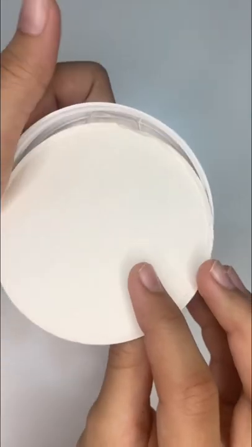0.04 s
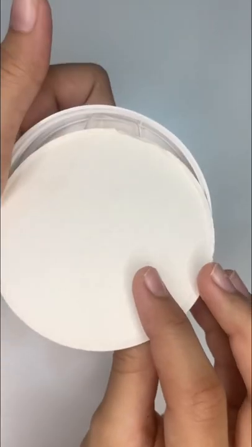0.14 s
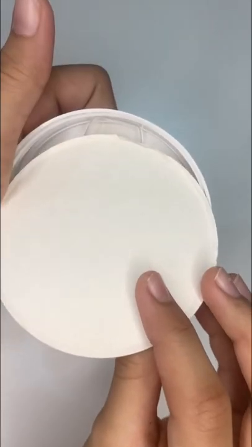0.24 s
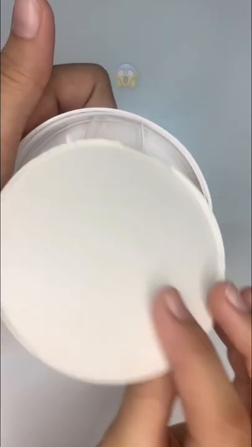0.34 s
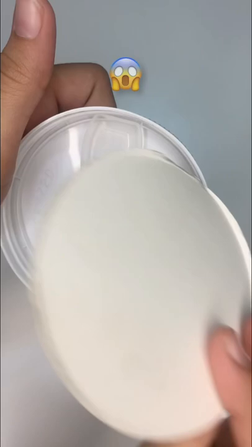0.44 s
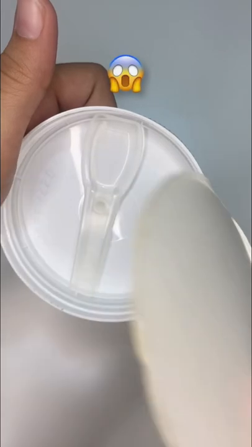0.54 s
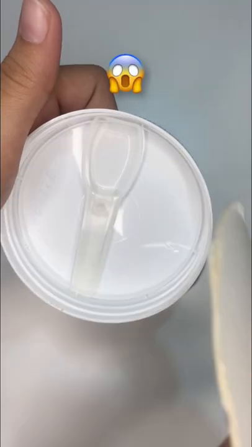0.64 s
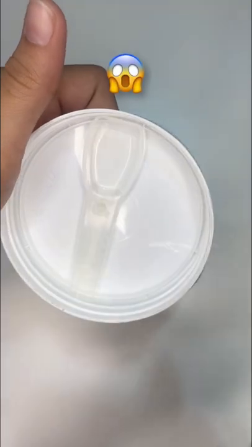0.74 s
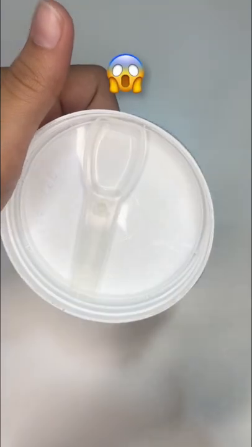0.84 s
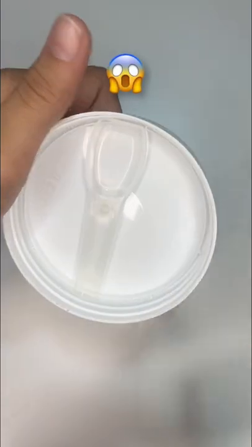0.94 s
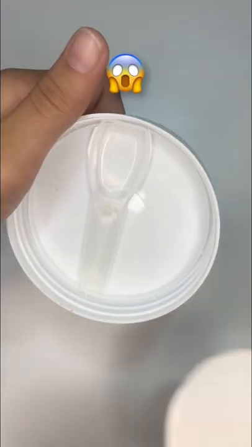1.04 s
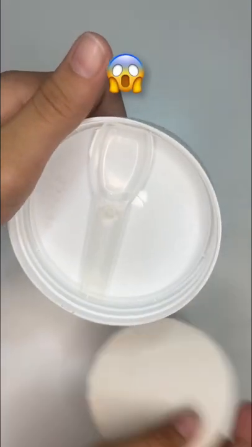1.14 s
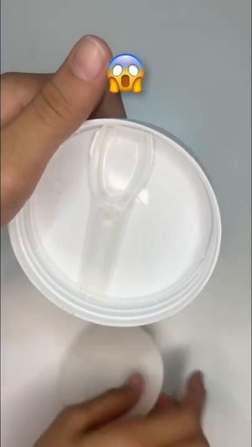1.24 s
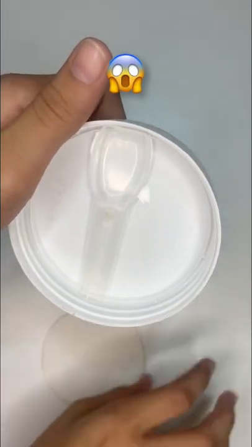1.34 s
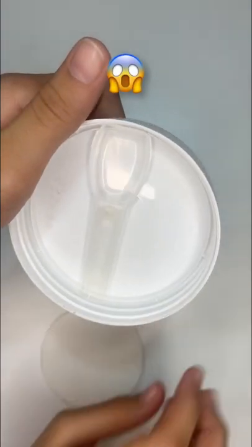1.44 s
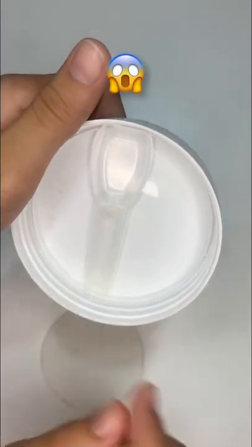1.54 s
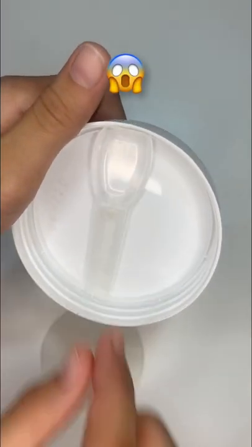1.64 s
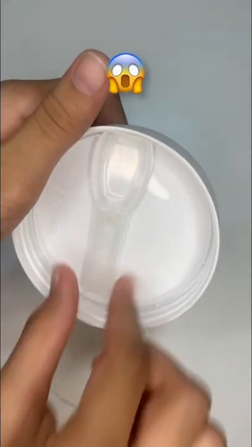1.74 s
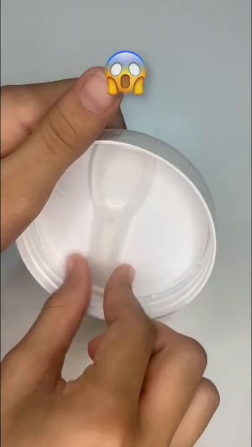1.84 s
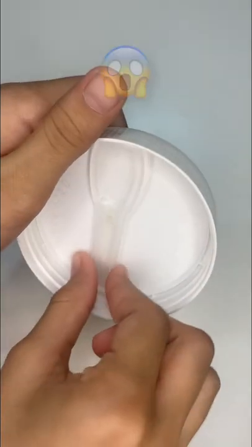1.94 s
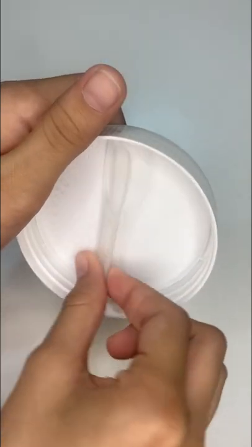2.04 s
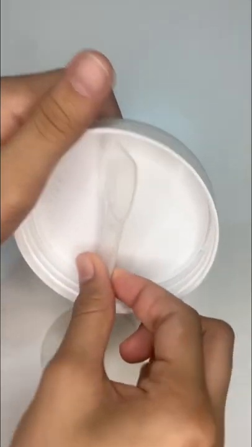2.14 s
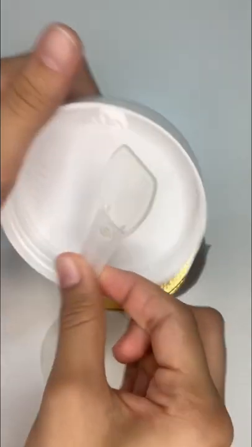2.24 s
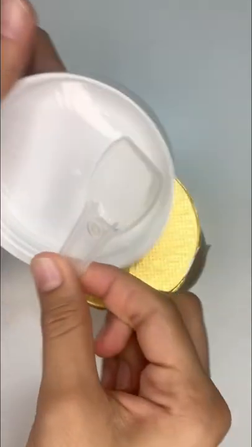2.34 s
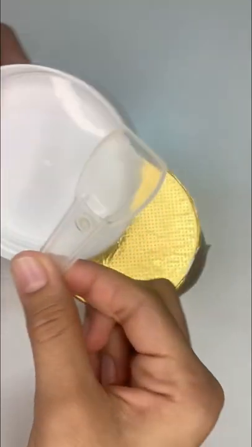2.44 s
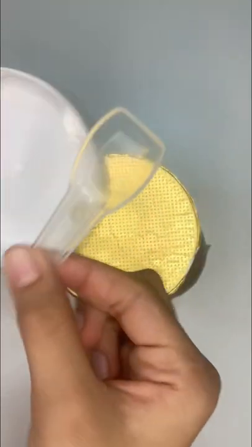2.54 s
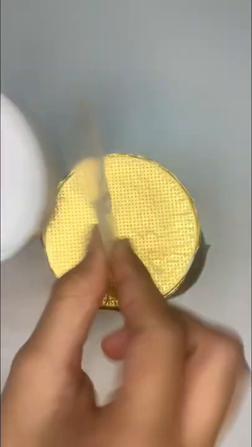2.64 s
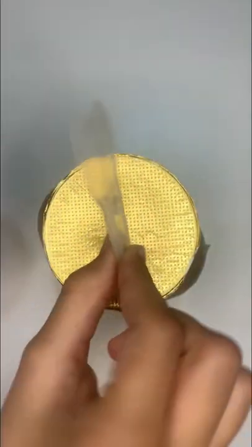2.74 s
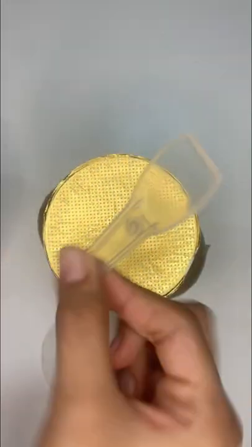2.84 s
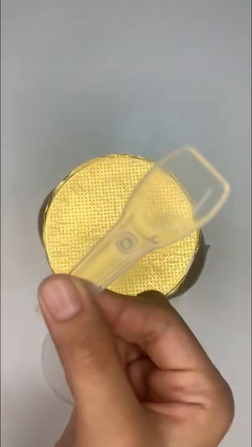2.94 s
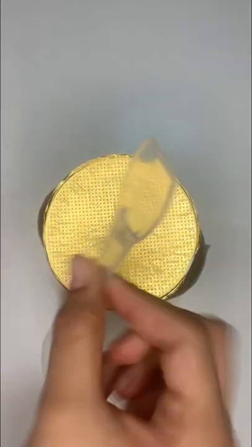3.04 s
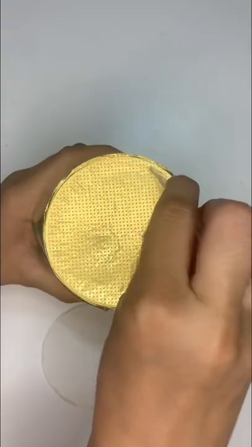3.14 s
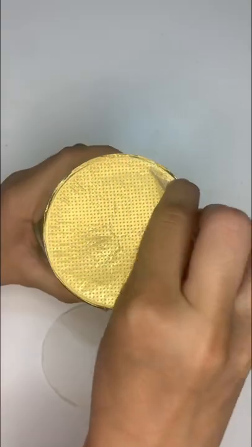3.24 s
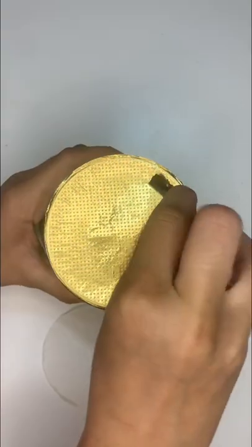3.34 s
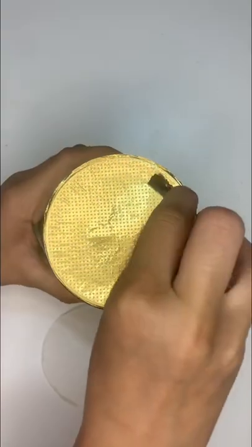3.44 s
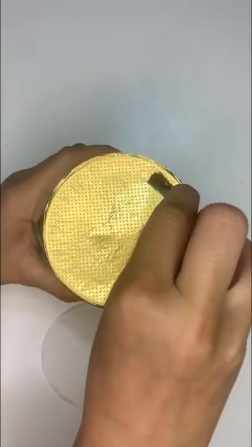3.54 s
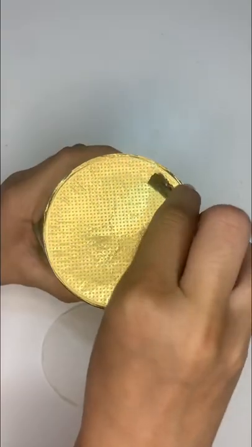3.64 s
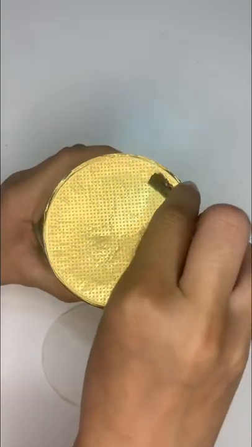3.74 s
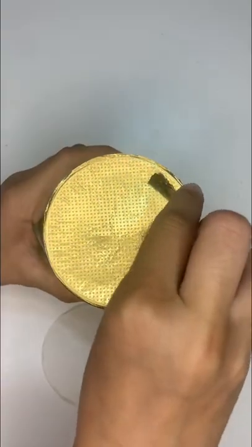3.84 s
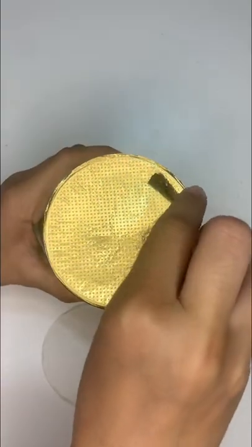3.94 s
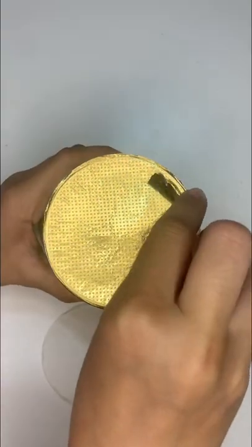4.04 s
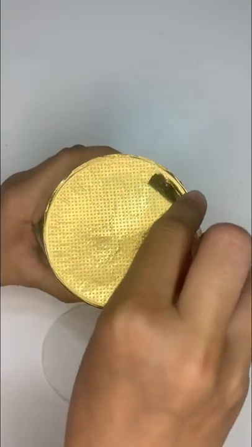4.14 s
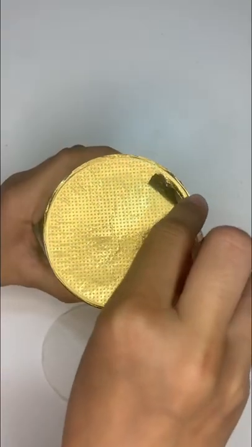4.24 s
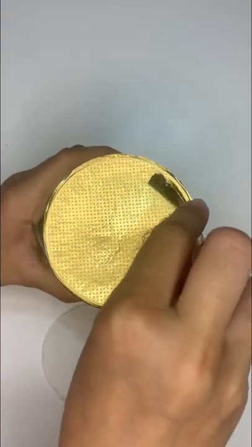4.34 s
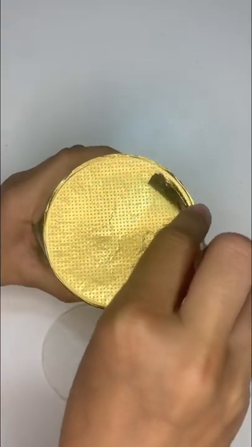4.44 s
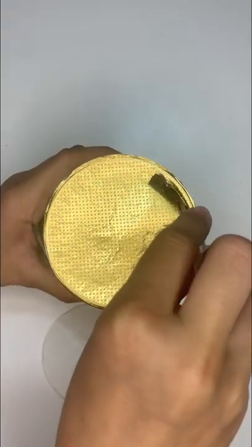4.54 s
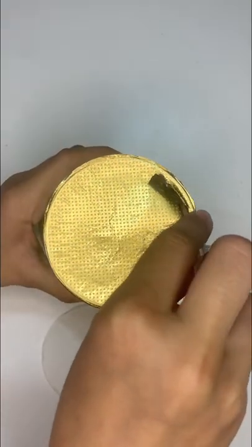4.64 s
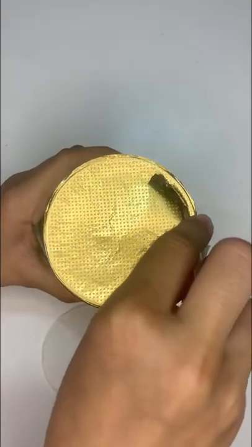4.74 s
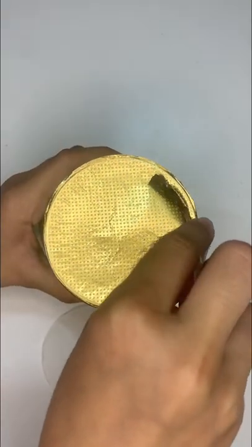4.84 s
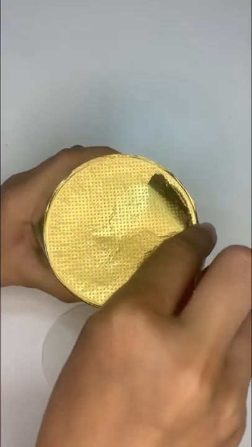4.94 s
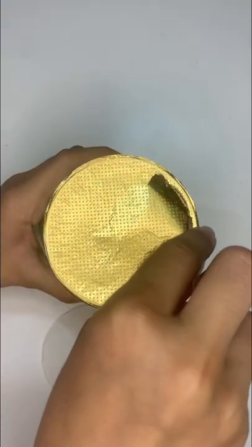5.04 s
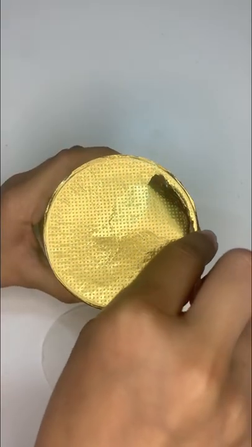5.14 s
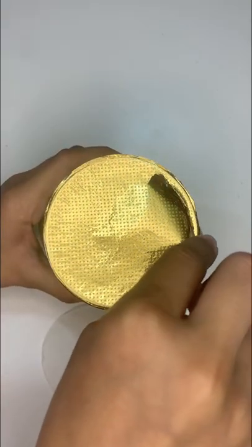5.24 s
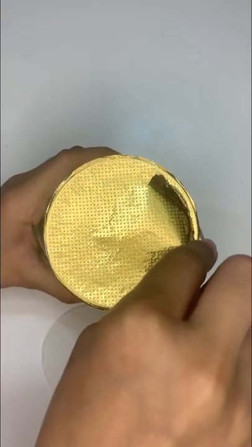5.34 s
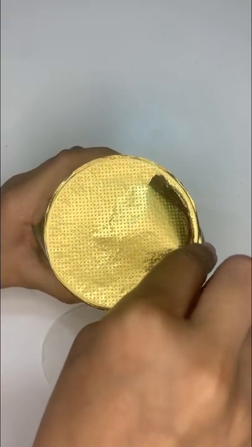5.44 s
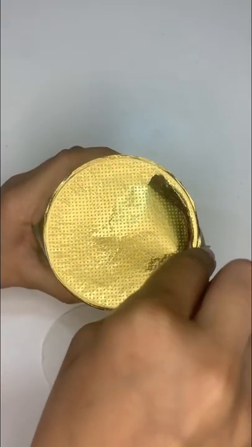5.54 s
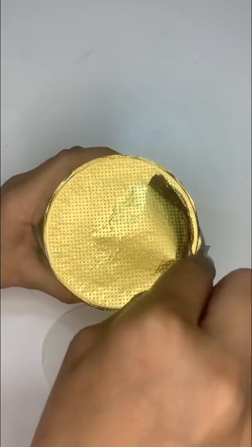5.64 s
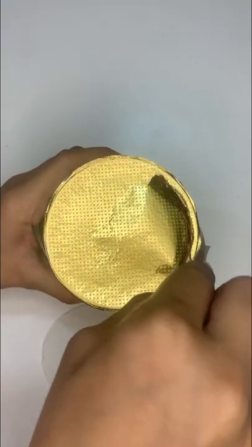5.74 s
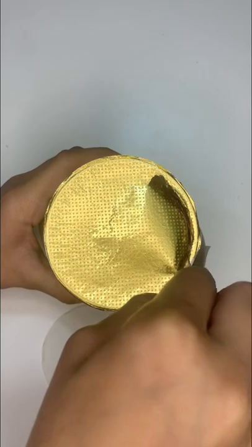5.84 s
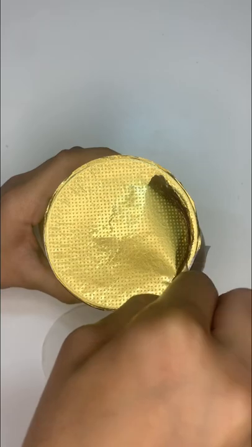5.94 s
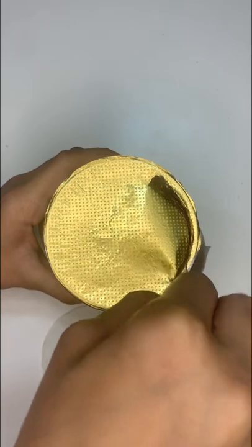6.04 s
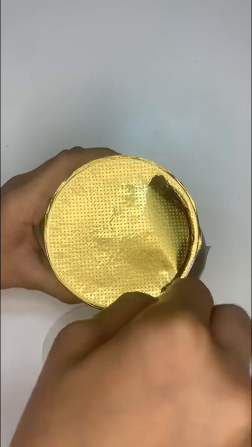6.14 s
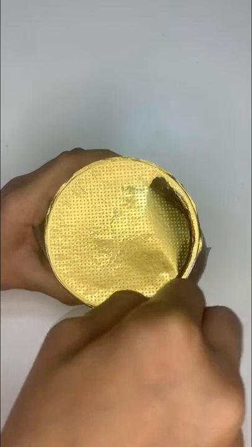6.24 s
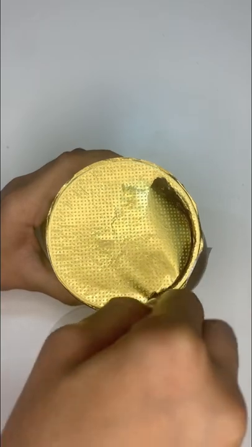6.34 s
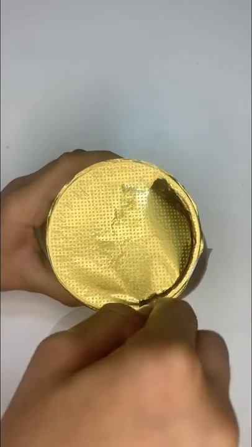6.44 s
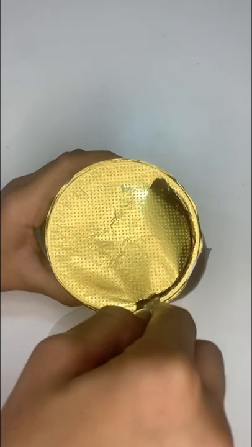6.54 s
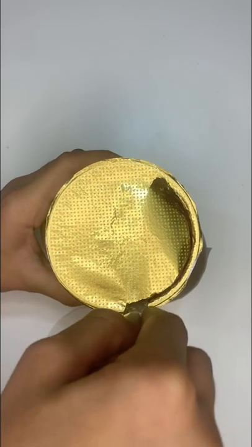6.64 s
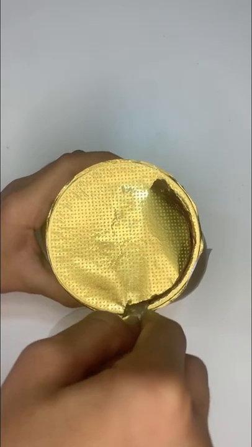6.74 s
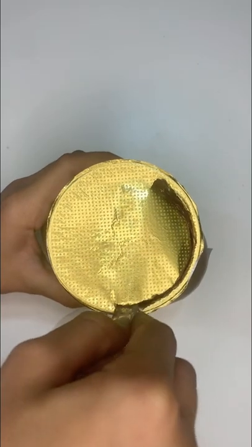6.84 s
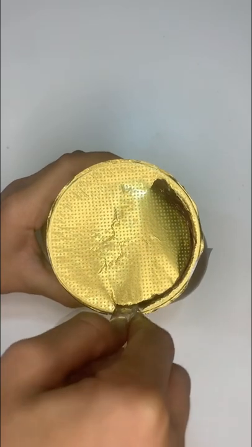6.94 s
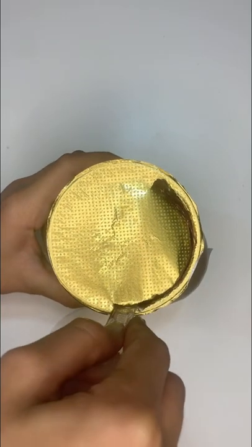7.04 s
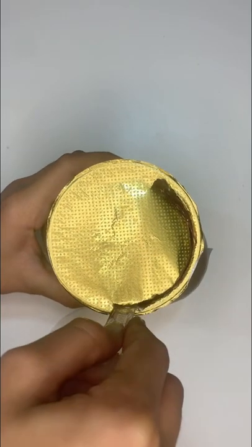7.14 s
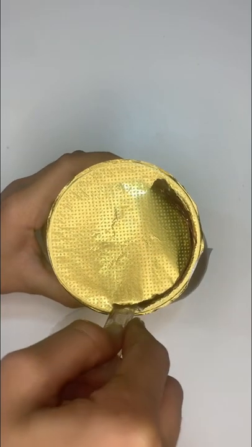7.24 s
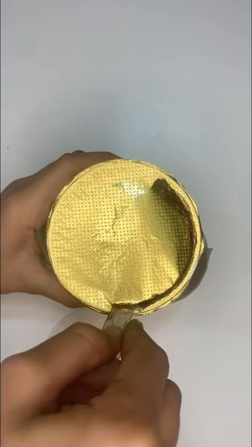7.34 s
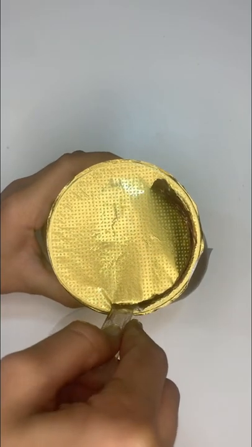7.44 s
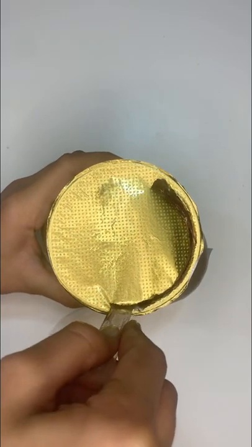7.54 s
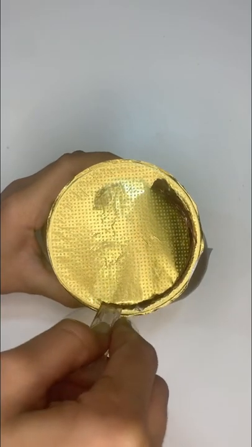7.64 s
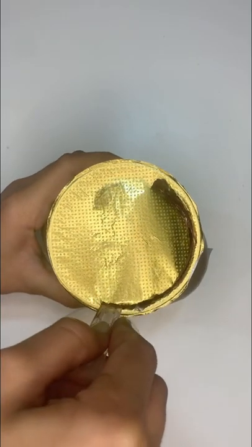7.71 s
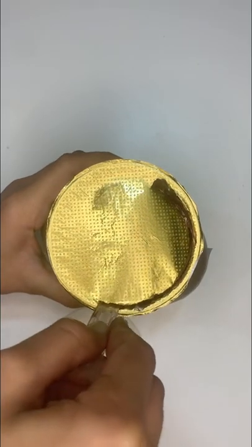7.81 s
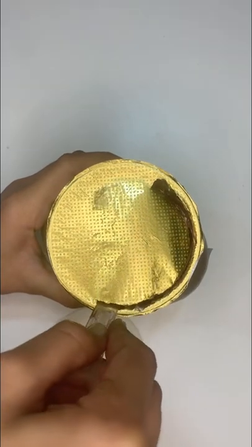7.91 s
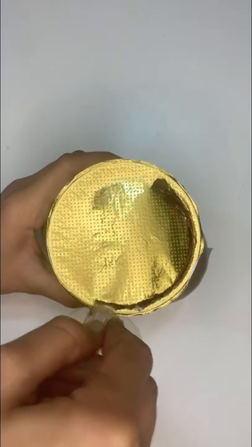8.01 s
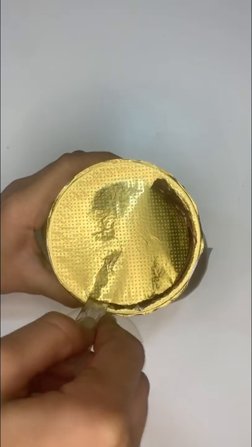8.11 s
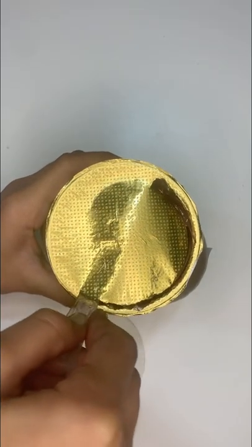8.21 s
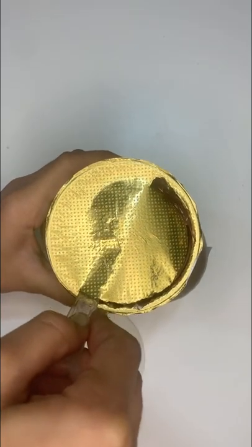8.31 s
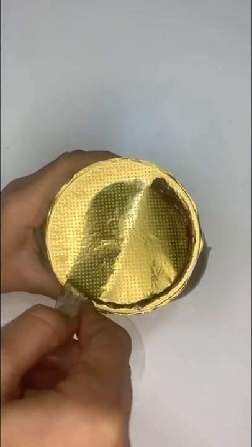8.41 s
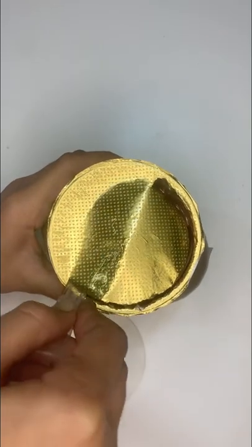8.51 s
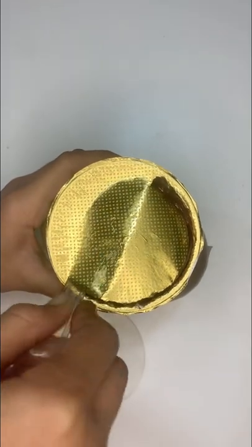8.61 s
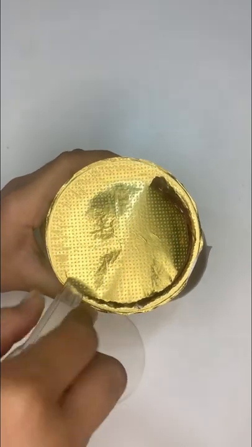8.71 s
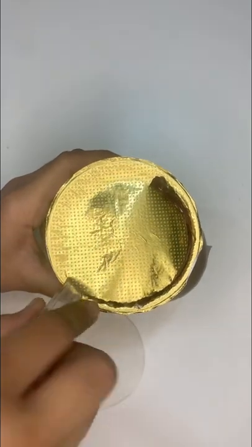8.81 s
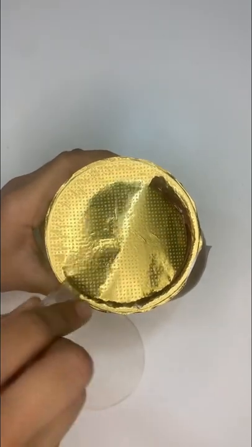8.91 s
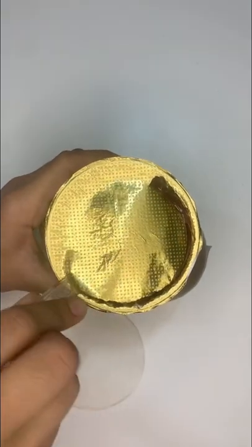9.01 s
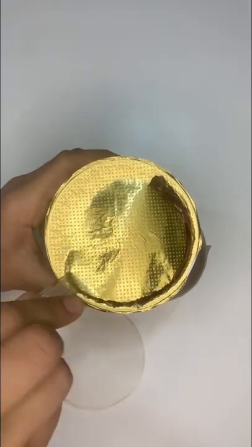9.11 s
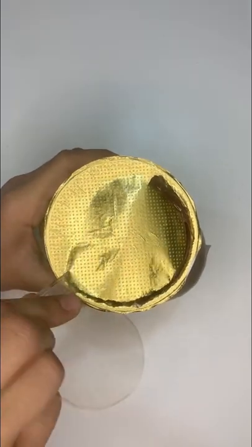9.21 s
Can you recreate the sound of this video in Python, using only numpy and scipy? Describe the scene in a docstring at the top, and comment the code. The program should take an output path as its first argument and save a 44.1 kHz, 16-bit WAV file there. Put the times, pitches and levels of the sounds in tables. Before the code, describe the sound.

Quiet plastic handling comes first: faint finger rustle, tiny clicks, a disc dropped on the table and a loud plastic clack near three seconds. A scoop then punches through a foil seal, and after a near-silent moment it saws around the rim. Thin crinkly ticks thicken into sharp, snapping tears with a more hollow jar tone. Recorded closely on a tabletop in a small room, over soft air noise and low hum.

```python
"""Fingers rub and click plastic over a low hum; a lid and scoop knock the table, then a foil seal tears.
Rustles are clumped grains of noise; impacts are dying modes with a short broad crack.
The foil tears in slips of dense ticks, which excite the foil, its loose flap and the air in the jar.
A machine hums far off as a low line, overtones and wavering low lines, under steady air noise.
A small room answers each near sound, and two microphone ports hear it with different phase."""
import sys
import numpy as np
from scipy import signal
from scipy.fft import rfft, irfft
from scipy.io import wavfile
from scipy.ndimage import uniform_filter1d

SR = 44100
rng = np.random.default_rng(int(sys.argv[2]) if len(sys.argv) > 2 else 0)


def store_wav(level_fs):
    """Save 16-bit WAV to argv[1]."""
    pcm = np.round(np.clip(np.atleast_2d(level_fs), -1, 1) * 32767)
    wavfile.write(sys.argv[1], SR, pcm.T.astype(np.int16))


N = 408807
T = np.arange(N) / SR  # time [s]

# Slips of the tearing foil: (time [s], level [dB], treble relative to body [dB], length [s])
SLIPS = [(4.177, -34.5, -22, 0.019), (4.26, -41, -24, 0.0066), (4.278, -38, -32, 0.015),
         (4.326, -31, -13.5, 0.026), (4.361, -33.5, -10, 0.023), (4.414, -53, -24, 0.0048),
         (4.444, -48, -30, 0.0055), (4.576, -25, -16.5, 0.012), (4.604, -36, -10, 0.02),
         (4.631, -32, -16, 0.033), (4.648, -36, -13, 0.0055), (4.665, -32, -18, 0.022),
         (4.681, -26, -31, 0.0022), (4.695, -34, -11, 0.0055), (4.71, -30, -15.5, 0.0048),
         (4.759, -39.5, -20, 0.015), (4.782, -35, -22, 0.005), (4.833, -42, -27, 0.0043),
         (4.848, -47, -25, .003), (4.876, -45, -30, 0.0079), (4.894, -36, -18, 0.043),
         (4.936, -26, -23, 0.0067), (4.976, -26.5, -20, 0.013), (5.004, -43, -24, 0.0065),
         (5.062, -30.5, -18, 0.016), (5.094, -37.5, -25, 0.005), (5.125, -35, -29, 0.0076),
         (5.157, -23.5, -22, 0.013), (5.171, -28.5, -16, 0.0092), (5.192, -24, -15, 0.0075),
         (5.265, -24, -18.5, 0.013), (5.283, -28.5, -13, 0.0042), (5.375, -30.5, -18, 0.025),
         (5.403, -28, -17.5, 0.016), (5.488, -32, -11.5, 0.028), (5.533, -34, -10, 0.015),
         (5.546, -29, -9.5, 0.026), (5.593, -32, -12, 0.034), (5.66, -28, -8.5, 0.043),
         (5.769, -32, -17, 0.04), (5.802, -37, -4, 0.0078), (5.872, -28, -8.5, 0.023),
         (6.037, -41, -15, 0.0034), (6.067, -19, -14, 0.024), (6.084, -20.5, -14, 0.012),
         (6.182, -30.5, -17, 0.0067), (6.198, -35, -13, 0.0035), (6.214, -28, -18, .002),
         (6.233, -23.5, -10, 0.0059), (6.239, -17.5, -14, 0.01), (6.271, -22, -14, 0.016),
         (6.291, -20.5, -10, 0.014), (6.354, -25.5, -10, 0.0099), (6.364, -20.5, -7.5, 0.0063),
         (6.382, -28, -3, 0.025), (6.45, -22, -16, 0.02), (6.513, -23, -34, 0.0018),
         (6.576, -18.5, -16.5, 0.002), (6.592, -20, -17.5, 0.0073), (6.611, -17.5, -10.5, 0.0065),
         (6.624, -16.5, -16, 0.0074), (6.636, -29, -11, 0.0047), (6.754, -27, -17.5, 0.009),
         (6.764, -8, -20.5, 0.0036), (6.778, -13.5, -14, 0.0094), (6.994, -30.5, -20, 0.022),
         (7.006, -29, -12, 0.0078), (7.166, -44, -16, 0.011), (7.273, -48.5, -8.5, 0.015),
         (7.47, -42.5, -14.5, 0.0037), (7.526, -32, -40, 0.0056), (7.541, -25, -21, 0.0038),
         (7.545, -20, -14.5, 0.0038), (7.561, -37, -11.5, 0.0033), (7.569, -19.5, -27, 0.0025),
         (7.577, -30.5, -6, 0.0028), (7.59, -12.5, -13.5, 0.0063), (7.607, -17.5, -19, 0.0054),
         (7.61, -28, -14, 0.0074), (7.76, -23, -24, 0.0069), (7.778, -17, -17.5, 0.0044),
         (7.797, -15.5, -19.5, 0.0047), (7.884, -31.5, -22, 0.0099), (7.904, -22.5, -17.5, 0.0096),
         (7.983, -39, -19, 0.0046), (7.99, -36, -19, 0.0044), (8.009, -22, -20, 0.012),
         (8.022, -7.5, -26, 0.0079), (8.033, -12.5, -24, 0.0031), (8.133, -34.5, -24, 0.0057),
         (8.152, -14.5, -22.5, 0.006), (8.161, -14.5, -19, 0.0053), (8.168, -7, -26.5, 0.0079),
         (8.354, -15.5, -28, 0.0063), (8.369, -8.5, -21, 0.014), (8.379, -14, -15, 0.0063),
         (8.394, -12.5, -22, 0.0054), (8.401, -13.5, -21, 0.0049), (8.443, -31, -26, 0.019),
         (8.608, -39.5, -30, 0.043), (8.9013, -15, -28, 0.0025), (8.91, -13, -17.5, 0.008),
         (8.931, -17, -20, 0.0034), (8.935, -12, -25, 0.005), (8.957, -23, -20, .003),
         (8.966, -16.5, -20.5, 0.0064), (8.979, -16.5, -14.5, 0.004), (9.01, -33, -14, 0.0055),
         (9.21, -30, -36, 0.017), (9.244, -25, -25.5, 0.0048)]
# The scoop first punches through the foil: (time [s], level [dB], treble relative to body [dB])
PUNCH = [(3.238, -54, -30), (3.251, -16.5, -16), (3.255, -21.5, -20), (3.3, -26, -12.5), (3.31, -40.5, -11),
         (3.359, -49.5, -10.5), (3.42, -73.5, -26)]
# Steady pulls of the scoop: (start [s], length [s], level [dB], treble relative to body [dB])
PULLS = [(4.152, 0.33, -42.5, -19.5), (4.507, 0.1, -41, -25), (4.73, 0.077, -39.5, -25),
         (4.82, 0.2, -41.5, -22.5), (5.023, 0.31, -46.5, -18), (5.359, 0.09, -36, -16),
         (5.438, 0.39, -46, -14), (5.834, 0.066, -36, -15), (5.92, 0.1, -52, -13),
         (6.15, 0.263, -41.5, -27), (6.537, 0.093, -36.5, -22.5), (7.727, 0.056, -45, -9),
         (7.938, 0.057, -36.5, -15), (8.565, 0.18, -51.5, -19.5), (8.893, 0.055, -31, -17.5),
         (9.17, 0.11, -39.5, -29)]
# How far the tear has opened the jar: (time [s], share [0-1])
OPENING = [(4.2, 0), (5.9, 0), (6.3, 0.32), (6.8, 0.84), (8., 0.91), (9.2, 1)]
# Relative spectrum of the foil while taut: (frequency [Hz], level [dB])
TAUT_FOIL = [(300, -11.5), (600, -5.5), (900, 3), (1500, -0.5), (2200, -0.5), (3200, -15.5), (3800, -17),
             (4350, -11), (4900, -5.5), (6500, -30)]
# Relative spectrum of the air in the opened jar: (frequency [Hz], level [dB])
OPEN_JAR = [(500, -32), (900, 3), (1200, 11), (1500, 0), (2200, -7), (3200, -24), (4500, -12.5),
            (6500, -51.5)]
# Relative spectrum of the jar wall: (frequency [Hz], level [dB])
JAR_WALL = [(60, -25), (120, -2), (230, 2.5), (400, -3.5), (700, -27.5)]
# Relative spectrum of the foil's treble: (frequency [Hz], level [dB])
CRINKLE = [(4000, 0.5), (5000, 6), (6700, 6), (8500, -3.5), (10500, -6), (12000, -7), (14000, -9),
           (15500, -22)]
# Modes of the loose flap, with the gain of each drive:
# (frequency [Hz], width [Hz], body drive shut [dB], body drive open [dB], crinkle drive [dB])
FLAP_MODES = [(2121, 200, 5.5, 3.5, -1.5), (3085, 780, -25, -14, 11.5)]
# How freely the flap rings as the tear moves on: (time [s], lower mode [dB], upper mode [dB])
FLAP_RING = [(3.25, 5.5, 0.5), (3.36, 12, -2), (4.2, 10.5, 3.5), (4.7, 4, -11), (5.1, 1, 2), (5.5, -11, -4),
             (5.9, 0, -2.5), (6.08, 8, 0), (6.25, 6.5, -0.5), (6.4, 8.5, 0.5), (6.6, -4, 1), (6.78, 4.5, 2),
             (7., -8, 4.5), (7.6, -16.5, 6.5), (7.78, -16, 0.5), (8.02, 6.5, 0.3), (8.16, 3, -1),
             (8.38, 6, 0), (8.93, -12.5, -14), (9.22, -1, 10)]
# Sagging ring of the slackening foil: (from [Hz], to [Hz], time constant [s], width [Hz],
# drive shut [dB], drive open [dB], spread of log pitch between slips [1])
SAG = (2510, 1050, 0.0065, 400, 3.8, 1, 0.26)

# Plastic clicks: (time [s], ring level [dB], ring frequency [Hz], snap relative to ring [dB])
CLICKS = [(0.257, -48, 2530, -8), (0.279, -41, 1970, 2), (0.285, -30.5, 3800, 4.5), (0.298, -36, 2440, 6),
          (0.307, -40.5, 2070, 7.5), (1.327, -37, 930, -9), (1.746, -38, 1400, 6), (1.756, -41, 1100, 2),
          (1.775, -28.5, 1130, 6), (1.778, -24, 4200, -6), (1.795, -30.5, 1260, -0.5),
          (1.843, -39.5, 1540, -3), (1.96, -57, 3300, -4), (1.977, -51, 1400, -12), (2.007, -31, 1300, 3),
          (2.024, -42, 1340, 6.5), (2.165, -50, 1700, -2), (2.204, -45, 1730, -6), (2.759, -34, 1230, -13),
          (3.163, -36.5, 1320, -11), (3.225, -45, 1220, -5.5), (3.411, -53.5, 1610, -3),
          (4.053, -50, 1880, -19), (4.067, -45.5, 1930, -10)]
# Knocks on the table, and at 3.252 s the low thump of the punch through the foil:
# (time [s], ring level [dB], pitch factor [1], ring time factor [1],
# thud level [dB], thud frequency [Hz], thud t60 [s], snap level [dB])
KNOCKS = [(1.2271, -24, 0.85, 0.64, -28.5, 221.3, 0.24, -8),
          (1.3108, -32, 0.59, 1.4, -33.5, 225, 0.11, -22), (1.752, -43, 0.77, .6, -30.5, 111, 0.056, -37),
          (2.01, -36, 0.79, 0.28, -30.5, 405, 0.0094, -43),
          (3.0645, -6.5, 0.95, 0.82, -23.5, 222, 0.24, -11),
          (3.252, -26.5, 0.97, 1.2, -30, 196, 0.082, -33)]
# Modes of the plastic piece, scaled by each knock: (frequency [Hz], relative level [dB], t60 [s])
PLASTIC_MODES = [(782, 0.5, 0.028), (966, -5.5, 0.027), (1134, -7.5, 0.091), (1265, -10.5, 0.045),
                 (1380, 3.5, 0.013), (1338, 0, 0.044), (1530, -13, 0.076), (1870, -12.5, 0.074),
                 (2243, 2.5, 0.013), (2450, -22.5, 0.035), (3840, -10.5, 0.017)]
# Modes of the thud, scaled by each knock: (frequency factor [1], relative level [dB], t60 factor [1])
THUD_MODES = [(1, -0.5, 0.82), (0.85, -9.5, 0.62), (1.24, -9, 0.57), (1.45, -14.5, 0.73), (1.98, -10, 0.46)]
# Relative spectrum of a broad crack: (frequency [Hz], level [dB])
SNAP = [(500, -24.5), (1200, -1), (3000, -0.5), (6000, -1), (10000, -8.5), (12500, -10.5), (15500, -26.5)]

# Rustling noise of sliding fingers, and the noisy tails of knocks at 1.24, 2.015 and 3.068 s;
# swell and fade each span TOUCH_DB: (time of maximum [s], level [dB], swell [s], fade [s])
RUBS = [(.04, -65, 0.96, 0.12), (0.201, -64.5, 0.12, 0.1), (.295, -49.5, 0.065, 0.048),
        (.37, -60.5, 0.046, 0.022), (1.099, -60.5, 0.23, .08), (1.24, -46, 0.045, 0.11),
        (1.799, -41.5, 0.054, 0.012), (1.87, -62.5, 0.098, 0.016), (2.015, -57.5, 0.044, 0.093),
        (2.16, -65.5, 0.19, 0.25), (2.778, -61, 0.13, 0.042), (3.068, -34.5, 0.023, 0.11),
        (3.79, -70, 0.07, 0.11), (3.885, -64.5, 0.025, 0.073), (4.0, -67.5, 0.18, 0.43)]
# Relative spectrum of the rustling grains: (frequency [Hz], level [dB])
SKIN = [(700, 4), (1300, 0.5), (2200, 0.5), (3500, -7.5), (5000, -10.5), (7000, -14.5), (11000, -18.5),
        (15000, -24.5)]
# Centre of the moving rustle band: (time [s], frequency [Hz])
RUSTLE = [(0., 2300), (.1, 1900), (.15, 1690), (.19, 2020), (.3, 2270), (.37, 1800), (1.03, 1520),
          (1.11, 2080), (1.24, 1760), (1.8, 2170), (2.05, 1540), (2.16, 1678), (3.07, 1603), (3.8, 2160),
          (4.1, 2000)]

# Swelling and fading of the lowest hum line: (time [s], RMS level [dB])
HUM_LEVEL = [(0.0, -38), (0.13, -36), (0.44, -56), (0.62, -39), (0.93, -36.5), (1.24, -55), (1.37, -40),
             (2.43, -38), (2.679, -51), (3.77, -39.5), (3.97, -60.5), (4.18, -39), (4.46, -45),
             (5.55, -37.5), (6.07, -45.5), (6.35, -37), (6.69, -43), (6.92, -55), (8.111, -37),
             (9.27, -42.5)]
# Clean overtones of the hum: (multiple of HUM_HZ [1], RMS level [dB])
OVERTONES = [(2, -51), (3, -63), (4, -59.5), (5, -69)]
# Wavering low lines of the hum, at and between its overtones:
# (frequency [Hz], width [Hz], RMS level [dB])
DRONE = [(69.45, 8.8, -48), (95.3, 9.9, -52.5), (146.2, 12, -62.5), (191.66, 8.2, -59.5)]
# Relative spectral density of the air noise: (frequency [Hz], level [dB])
AIR = [(25, -36.5), (40, -20.5), (60, -7.5), (120, -22), (220, -23.5), (330, -25.5), (450, -40),
       (700, -42.5), (1200, -40), (2100, -47), (2900, -56.5), (5000, -58), (10500, -58.5), (12500, -67),
       (15500, -62.5)]
# Likeness of the air noise at both ports: (frequency [Hz], correlation, clipped to -1 to 1 [1])
LIKENESS = [(60, 0.92), (300, 0.76), (600, -0.99), (1400, 0.091), (2500, -1.4), (4500, 0.87), (8000, 0.23),
            (15000, 1)]

# Reverberation time of the room: (frequency [Hz], t60 [s])
ROOM = [(300, 0.55), (1200, 0.12), (4000, 0.16), (10000, 0.11)]
# Shading of near sounds: (frequency [Hz], left minus right [dB])
SHADE = [(300, -1), (700, -4.5), (1200, -1), (2000, -7), (2800, -6), (4000, -4.5), (6000, -1)]
# Phase between the ports: (frequency [Hz], lead of the left [rad])
PORT_PHASE = [(0, 0), (50, -.15), (150, -.4), (400, -1), (550, -2), (740, -5.3), (1400, -6.3), (2300, -5.4),
              (3000, -4.5), (4300, -4.3), (5000, -3.2), (7800, -.1), (9400, .1), (11700, 3.1), (13200, 3.2),
              (15300, 6.2), (16500, 6.3)]

SLIP_RISE_S, RISE_SHARE = 0.00079, 0.28  # a longer slip also rises more slowly
CREST_DB = 10.5  # reduction of the body ticks, whose peaks exceed their mean strength
LEAD = SR // 25  # build-up [samples]
BUILD_DB, BUILD_DB_PER_S = -29, 929.5  # crackle that builds up before each slip
AFTER_DB, AFTER_DB_PER_S = -26.5, 474  # crackle that runs on after each slip
TREBLE_BUILD_DB = 2.5  # extra treble in the build-up
DULLING_DB_PER_S = 261  # the treble of a slip dies sooner than its body
FIRST_SNAP_DB, SHORT_S, SNAP_MOST = 9., 0.0058, 2.08  # opening snap; SNAP_MOST [1] caps short slips
PULL_RISE_S, PULL_FALL_DB_PER_S = 0.063, 592
SMALL_PER_S, SMALL_S, SMALL_SPREAD_DB = 150, .0022, 2.5  # small chance slips ride on each pull
STEADY = .2  # constant part added to the small slips
SHARED = 0.69  # gain of the body ticks within the treble ticks
FLAP_CHANCE_DB = 3  # standard deviation between slips
SHEEN_HZ, SHEEN_WIDTH_HZ, SHEEN_DB = 6790, 335, 5  # a high ring of the foil
CLICK_T60 = 0.012  # [s]
TOUCH_DB = 25
RUSTLE_WIDTH_HZ, RUSTLE_WANDER, RUSTLE_DB = 270, 0.13, 10.5  # wander is in log frequency
CLUMP_DB = 3.5
UPPER, UPPER_DB = 3.1, -0.5  # second rustle band: frequency factor [1] and relative gain
BREAK_S = 3.112  # the ring of the loudest knock breaks off here
HUM_HZ = 48.45
AIR_DB = -51  # RMS over both ports
ROOM_DB = -8.5
EDGE_HZ = 16000  # upper band limit


def foil():
    """Source-filter principle: slip ticks excite the taut foil, its flap and the opening jar's air."""
    tear, crinkle = foil_ticks()
    share = np.clip(np.interp(T, *np.transpose(OPENING)), 0, 1)
    out = colour(tear * np.sqrt(1 - share), TAUT_FOIL) + colour(tear * np.sqrt(share), OPEN_JAR)
    slip_s = np.transpose(SLIPS)[0]
    slip = np.searchsorted(slip_s, T + 0.00596)  # each slip takes over slightly before its time
    out += flap(tear, crinkle, share, slip)
    out += sagging_ring(tear, crinkle, share, slip, slip_s)
    return out + gain_of(-24.0) * colour(tear, JAR_WALL) + colour(crinkle, CRINKLE)


def foil_ticks():
    """Stick-slip fracture: stored strain is freed as dense ticks, shaped by the slips and steady pulls."""
    body, treble = pull_strength()
    first = np.zeros((2, N))
    for s, db, treble_db, length in SLIPS:
        shortness = min(SHORT_S / length, SNAP_MOST)
        snap_db = db + FIRST_SNAP_DB + np.array([-CREST_DB, treble_db])
        first[:, round(s * SR)] = gain_of(snap_db) * shortness
        add_slip(body, treble, s, db, treble_db, length)
    snaps = ticks(per_s=1400, spread_db=3.5)
    tear = steadied(snaps, size=220) * body * gain_of(-CREST_DB) + first[0]
    fine = SHARED * snaps + ticks(per_s=1600, spread_db=2.0)
    crinkle = steadied(fine, size=220) * treble + first[1]
    return tear, crinkle


def pull_strength():
    """Intermittent friction: small chance slips modulate the punch and each steady pull of the scoop."""
    t = T[:SR // 5]
    chance = abs(ticks(SMALL_PER_S, SMALL_SPREAD_DB))
    small = STEADY + evened(signal.oaconvolve(chance, np.exp(-t / SMALL_S))[:N])
    s, db, treble_db = np.transpose(PUNCH)
    body = small ** .3 * level(s, db)
    treble = small ** 0.33 * level(s, db + treble_db)
    for s, length, db, treble_db in PULLS:
        fall_db = PULL_FALL_DB_PER_S * np.clip(T - s - length, 0, 1)
        rise = np.clip((T - s) / PULL_RISE_S, 0, 1)
        pull = gain_of(db - fall_db) * rise * small
        body += pull
        treble += gain_of(treble_db) * pull
    return body, treble


def add_slip(body, treble, s, db, treble_db, length):
    """Strain release: crackle builds up, the slip rises and decays, and its treble dies first."""
    t = T[:SR // 5]
    rise = SLIP_RISE_S + RISE_SHARE * length
    decay = np.exp(-(t / (rise + max(length, .002))) ** 1.9)
    after = gain_of(AFTER_DB - AFTER_DB_PER_S * t)
    build = gain_of(BUILD_DB - BUILD_DB_PER_S * t[:LEAD][::-1])
    onset = np.maximum(1 - np.exp(-(t / rise) ** 2), build[-1])
    slip = gain_of(db) * np.r_[build, onset * (decay + after)]
    dulling = gain_of(-DULLING_DB_PER_S * np.r_[np.zeros(LEAD), t])
    bright = np.r_[np.full(LEAD, gain_of(TREBLE_BUILD_DB)), np.ones(len(t))]
    add(body, s - 0.84 * rise - LEAD / SR, slip)
    add(treble, s - 0.52 * rise - LEAD / SR, gain_of(treble_db) * slip * dulling * bright)


def flap(tear, crinkle, share, slip):
    """Modal resonance: each slip reshapes the loose flap, changing the pitch and strength of its modes."""
    out = np.zeros(N)
    ring_s, *ring_levels = np.transpose(FLAP_RING)
    for (hz, width, shut_db, open_db, crinkle_db), ring_db in zip(FLAP_MODES, ring_levels):
        stretch, chance_db = rng.standard_normal((len(SLIPS) + 1, 2))[slip].T
        drive = tear * gain_of(shut_db + share * (open_db - shut_db)) + crinkle * gain_of(crinkle_db)
        drive = drive * gain_of(FLAP_CHANCE_DB * chance_db + np.interp(T, ring_s, ring_db))
        out += resonate(drive, hz * (1 + 0.071 * stretch), width)
    return out


def sagging_ring(tear, crinkle, share, slip, slip_s):
    """Tension sets pitch: each slip slackens the foil, whose ring sags; a high sheen varies by slip."""
    from_hz, to_hz, sag_s, width, shut_db, open_db, spread = SAG
    since = (T - np.r_[PUNCH[1][0], slip_s][slip]).clip(0)
    slack = np.exp(spread * rng.standard_normal(len(SLIPS) + 1)[slip])
    hz = slack * (to_hz + (from_hz - to_hz) * np.exp(-since / sag_s))
    drive = tear * gain_of(shut_db + share * (open_db - shut_db))
    sheen = resonate(crinkle, SHEEN_HZ * (1 + 0.59 * (slack - 1)), SHEEN_WIDTH_HZ)
    return resonate(drive, hz, width) + gain_of(SHEEN_DB) * sheen


def plastic(first_s, last_s):
    """Modal impact: clicks ring a mode and its neighbour; heavier blows ring the whole piece and a thud."""
    out = np.zeros(N)
    for s, db, hz, snap_db in CLICKS:
        if first_s <= s < last_s:
            modes = [(hz, 0, CLICK_T60), (1.1 * hz, -7, 1.1 * CLICK_T60)]
            add(out, s, gain_of(db) * ring(modes, soft_s=0.000081))
            add(out, s, gain_of(db + snap_db) * tick(t60=0.027))
    for s, db, pitch, ring_time, thud_db, hz, t60, snap_db in KNOCKS:
        if first_s <= s < last_s:
            piece = np.array(PLASTIC_MODES) * [pitch, 1, ring_time]
            thud = np.array(THUD_MODES) * [hz, 1, t60]
            add(out, s, gain_of(db) * ring(piece, soft_s=0.00052))
            add(out, s, gain_of(thud_db) * ring(thud, soft_s=0.0081))
            add(out, s, gain_of(snap_db) * uniform_filter1d(tick(t60=0.0083), size=4))
    return out


def rub(first_s, last_s):
    """Granular noise: clumped grains of finger rustle and knock tails, coloured by moving resonances."""
    touch = np.zeros(N)
    for s, db, swell, fade in RUBS:
        if first_s <= s < last_s:
            flank = np.maximum((s - T) / swell, (T - s) / fade).clip(0, 8)
            touch += gain_of(db - TOUCH_DB * flank)
    slow = uniform_filter1d(rng.standard_normal((2, N)), size=500)
    drift, clumps = uniform_filter1d(slow, size=500)
    grains = ticks(per_s=8100, spread_db=4.0) * touch
    hz = np.interp(T, *np.transpose(RUSTLE)) * np.exp(RUSTLE_WANDER * evened(drift).clip(-2, 2))
    clumped = grains * gain_of(CLUMP_DB * evened(clumps))
    lower = resonate(clumped, hz, RUSTLE_WIDTH_HZ)
    upper = gain_of(UPPER_DB) * resonate(clumped, UPPER * hz, RUSTLE_WIDTH_HZ)
    return colour(grains, SKIN) + gain_of(RUSTLE_DB) * (lower + upper)


def hum():
    """Periodic vibration: a swelling low line and clean overtones, plus wavering lines of narrow noise."""
    out = np.sqrt(2) * level(*np.transpose(HUM_LEVEL)) * np.sin(2 * np.pi * HUM_HZ * T)
    for multiple, db in OVERTONES:
        cycles = multiple * HUM_HZ * T + rng.random()
        out += np.sqrt(2) * gain_of(db) * np.sin(2 * np.pi * cycles)
    for hz, width, db in DRONE:
        out += gain_of(db) * evened(resonate(rng.standard_normal(N), np.full(N, hz), width))
    return out


def air():
    """Partial coherence: steady room noise has a frequency-dependent likeness at the two ports."""
    hz = np.fft.rfftfreq(N, 1 / SR)
    left, other = rfft(rng.standard_normal((2, N)))
    same = np.clip(read(LIKENESS, hz), -1, 1)
    right = same * left + np.sqrt(1 - same ** 2) * other
    spectra = np.array([left, right]) * gain_of(read(AIR, hz)) * (hz > 20)
    return gain_of(AIR_DB) * evened(irfft(spectra, N))


def room(x):
    """Diffuse reverberation: noise decays at its own speed in each band, partly shared by the ports."""
    shared, left, right = rng.standard_normal((3, SR // 2))
    noise = np.array([shared + 1.37 * left, shared + 0.59 * right])
    hz, t, z = signal.stft(noise, SR, nperseg=128)
    decay = gain_of(-60 * t / read(ROOM, hz)[:, None])
    tail = signal.istft(z * decay, SR, nperseg=128)[1]
    tail = tail * np.clip(T[:tail.shape[1]] / 0.0014, 0, 1)
    tail = tail / np.linalg.norm(tail[0])
    return x + gain_of(ROOM_DB) * signal.fftconvolve(x[None], tail, axes=1)[:, :N]


def gain_of(db):
    """Decibel law: amplitude ratio of a level."""
    return 10 ** (np.asarray(db) / 20)


def evened(x):
    """Normalisation to unit RMS."""
    return x / np.sqrt(np.mean(x ** 2) + 1e-20)


def read(points, hz):
    """Interpolation along a logarithmic frequency axis."""
    f, value = np.transpose(points)
    return np.interp(np.log(hz + 1), np.log(f + 1), value)


def add(mix, s, sound):
    """Superposition: adds a sound in place from time s."""
    part = mix[round(s * SR):][:len(sound)]
    part += sound[:len(part)]


def level(s, db):
    """Amplitude envelope: gain along a level curve, silent outside it."""
    return gain_of(np.interp(T, s, db)) * (T > s[0]) * (T < s[-1])


def colour(x, points):
    """Minimum-phase filtering: a causal response of energy 1 with the given relative spectrum."""
    log_gain = read(points, abs(np.fft.fftfreq(4096, 1 / SR))) * np.log(10) / 20
    response = np.exp(np.conj(signal.hilbert(log_gain)))
    taps = np.fft.ifft(response).real[:2048]
    return signal.oaconvolve(x, taps / np.linalg.norm(taps))[:len(x)]


def ticks(per_s, spread_db):
    """Random impulse process: clicks of either sign, a few of them large, at unit RMS."""
    size_db = spread_db * np.minimum(rng.exponential(1, N), 4)
    size = gain_of(size_db) * rng.choice([-1, 1], N)
    return evened(size * (rng.random(N) < per_s / SR))


def steadied(x, size):
    """Energy levelling: divides a tick train by its local strength, as a steady pull frees steady energy."""
    return x / np.sqrt(uniform_filter1d(x ** 2, size) + 0.12)


def resonate(x, hz, width):
    """Heterodyne resonance: shifts the curve hz down to zero, smooths twice, and shifts back."""
    turn = np.exp(2j * np.pi * np.cumsum(hz) / SR)
    r = np.exp(-np.pi * width / SR)
    smooth = signal.lfilter([(1 - r) ** 2], np.poly([r, r]), x / turn)
    return 2 * (turn * smooth).real


def ring(modes, soft_s):
    """Modal superposition: exponentially dying sines with a soft start, peak 1."""
    t = T[:SR // 3]
    x = sum(gain_of(db - 60 * t / t60) * np.sin(2 * np.pi * hz * t) for hz, db, t60 in modes)
    x = x * (1 - np.exp(-t / soft_s))
    return x / abs(x).max()


def tick(t60):
    """Broadband transient: a short crack of decaying noise, peak 1."""
    x = colour(gain_of(-60 * T[:2000] / t60) * rng.standard_normal(2000), SNAP)
    return x / abs(x).max()


def scene():
    """Superposition: near sounds get room and shading; what rings before the break falls silent at it."""
    before = plastic(0, BREAK_S) + rub(0, BREAK_S)
    after = plastic(BREAK_S, N / SR) + rub(BREAK_S, N / SR) + foil()
    fade = np.clip((BREAK_S - T) / 0.0029, 0, 1)
    near = fade * room(before) + room(after)
    half = gain_of(read(SHADE, np.fft.rfftfreq(N, 1 / SR)) / 2)
    shaded = irfft(rfft(near) * np.array([half, 1 / half]), N)
    return shaded + hum() + air()


def record(dry):
    """Phase difference between receivers: the left port is turned in phase, then both are band-limited."""
    turn = np.exp(1j * read(PORT_PHASE, np.fft.rfftfreq(N, 1 / SR)))
    ports = np.array([irfft(rfft(dry[0]) * turn, N), dry[1]])
    low_pass = signal.firwin(511, EDGE_HZ, window=("kaiser", 9), fs=SR)
    return signal.oaconvolve(ports, low_pass[None], "same")


dry = scene()
out = record(dry)
store_wav(out)
```